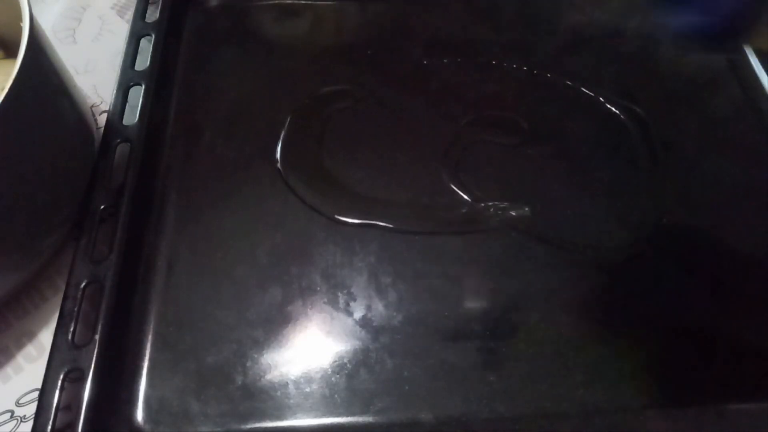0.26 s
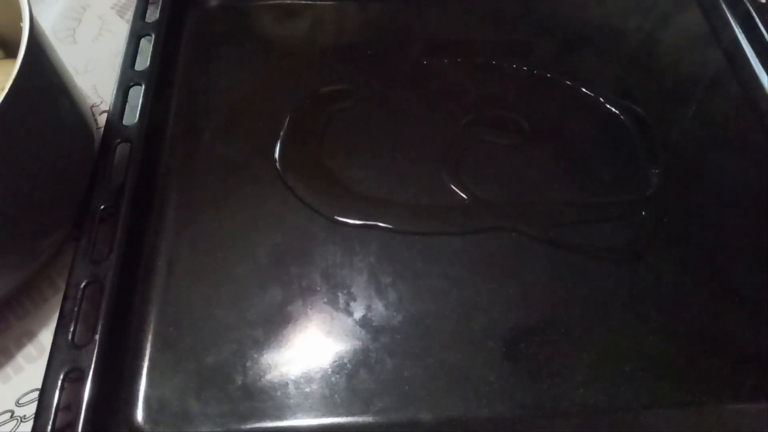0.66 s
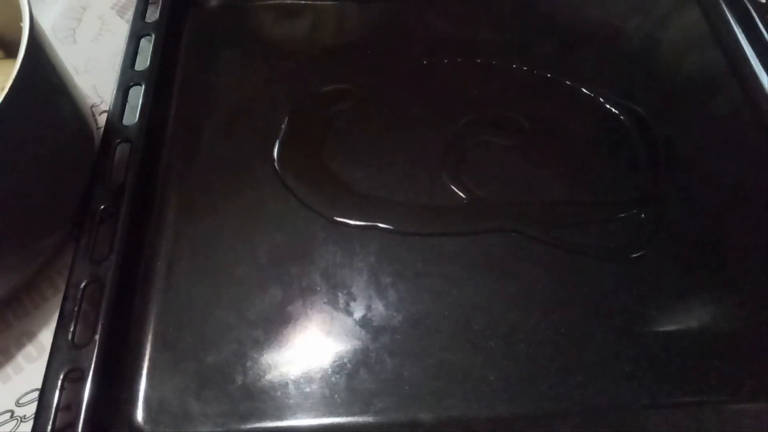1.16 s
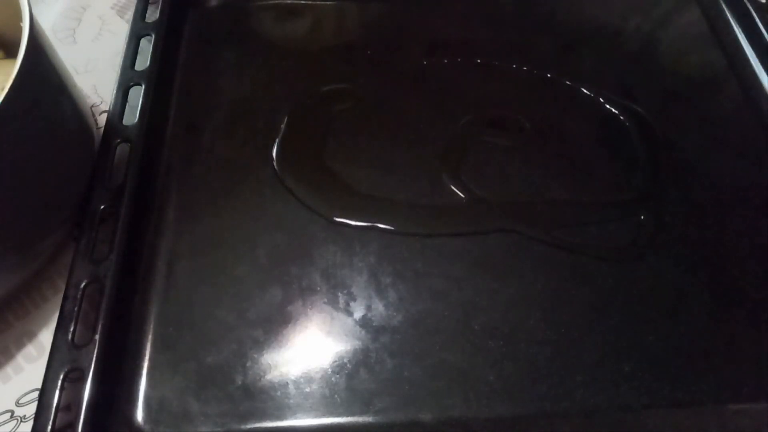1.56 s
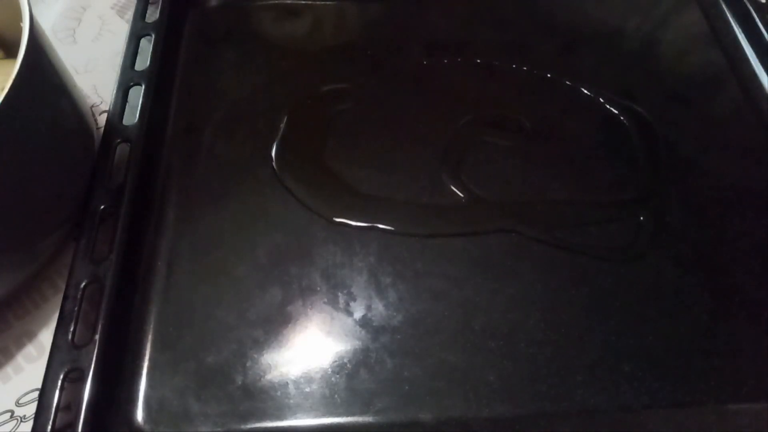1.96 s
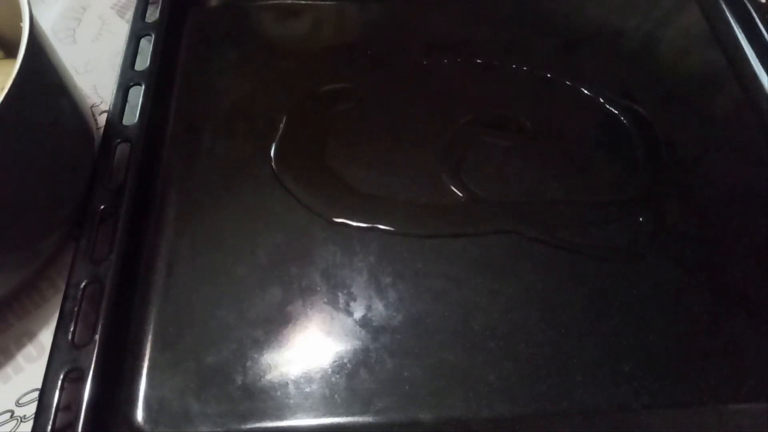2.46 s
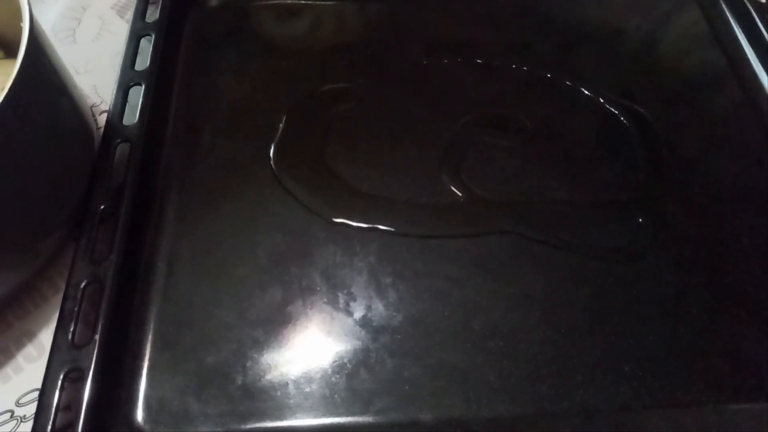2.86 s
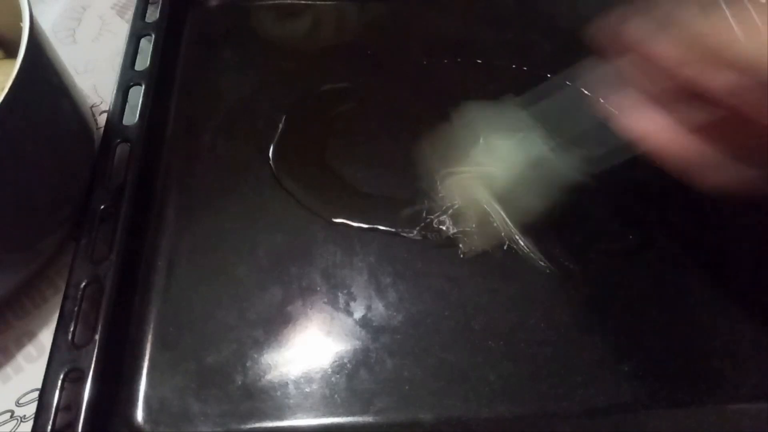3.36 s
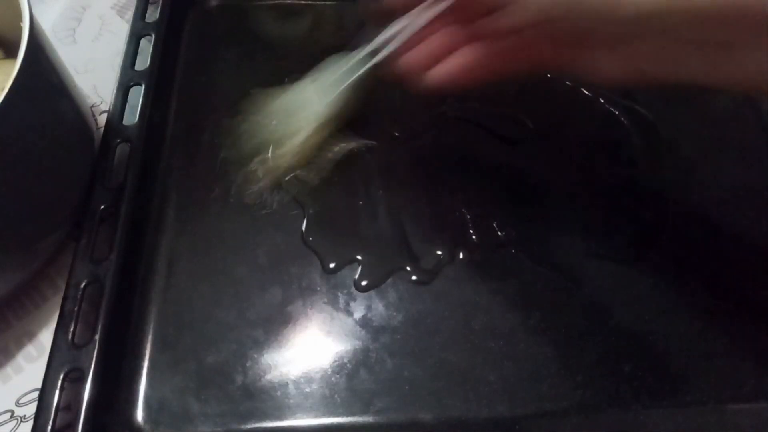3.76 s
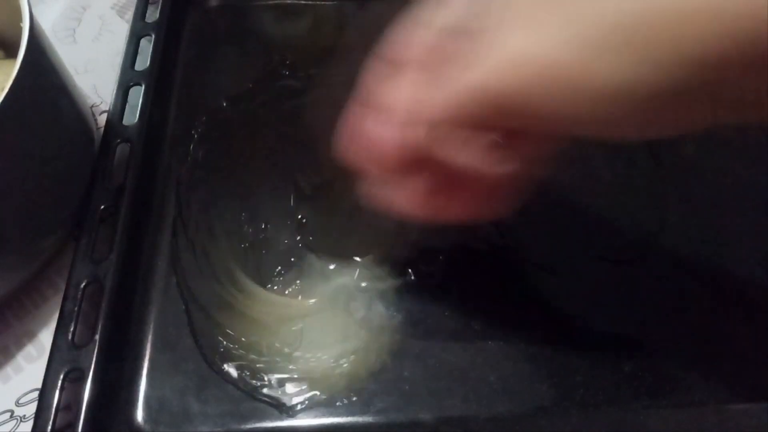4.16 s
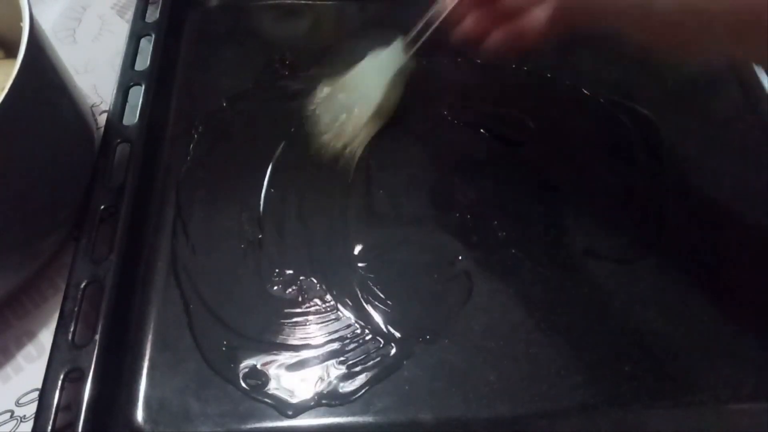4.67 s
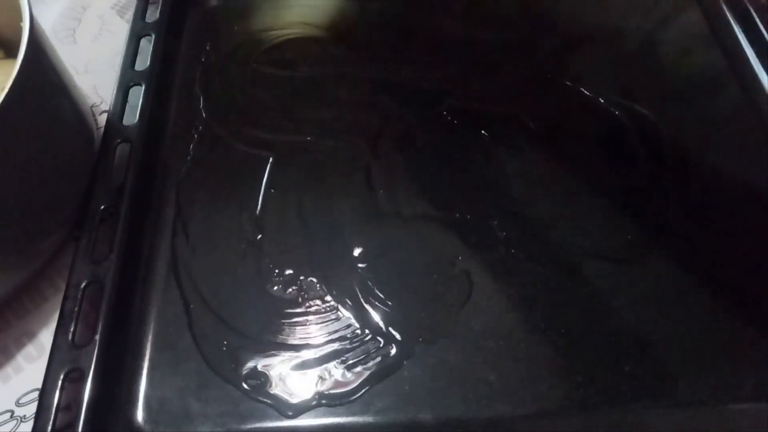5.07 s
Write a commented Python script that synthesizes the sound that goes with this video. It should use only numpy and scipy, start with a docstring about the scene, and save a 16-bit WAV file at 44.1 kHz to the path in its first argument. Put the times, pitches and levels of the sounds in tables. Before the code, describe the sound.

A handheld stereo microphone with faint hiss and muffled finger rumble hears quiet hand scuffs and taps, then a bottle landing hard on the worktop, by far the loudest sound, with a short boomy ring. After a lull and a few bright utensil clicks, a brush swishes over an oily baking tray, mostly to the right, with soft metallic drags, one squeak and a fainter gruff chatter near the end.

```python
"""Hand scuffs, light sliding and utensil knocks (bursts with two-mode rings), before and after
an oil bottle lands on a kitchen worktop: shoves, ringing modes, rattle.
A brush's bristles then drag oil over a metal tray: random catches drive its resonances, fizz, tick and
crackle, and two strokes chatter, one squeaky, one gruff: a stick-slip tone with scrape.
Throughout: finger shifts on a hand-held camera, hiss, a faint electronic tick; a small room answers."""
import sys
import numpy as np
from scipy import signal
from scipy.fft import rfft, irfft, next_fast_len
from scipy.io import wavfile
from scipy.ndimage import uniform_filter1d

SR = 44100
rng = np.random.default_rng(int(sys.argv[2]) if len(sys.argv) > 2 else 0)


def wav_record(signal):
    """Record a signal, one row per channel, as 16-bit PCM in the file named by sys.argv[1]."""
    frames = np.transpose(np.atleast_2d(signal))
    bounded = np.clip(frames, -1, 1)
    # unit amplitude maps onto the largest positive 16-bit level
    quanta = np.round(bounded * 32767).astype(np.int16)
    wavfile.write(sys.argv[1], SR, quanta)


N = 234258
TIME_S = np.arange(N) / SR

# Bottle base lands, rocks flat, settles:
# (time [s], push level [dB], push pitch [Hz], push length [s], rattle level [dB])
BOTTLE_LANDINGS = [(1.6183, -10.5, 225, 0.0055, -28), (1.6385, -18, 199, .019, -42.5),
                   (1.707, -25.5, 290, .016, -90)]
# Worktop and bottle modes: (frequency [Hz], relative level [dB], t60 [s])
WORKTOP_MODES = [(47, -17, .6), (60, -18, .6), (82, -14, .35), (94, -9, .45), (112, -7, .3), (127, 2, .3),
                 (152, 0, .38), (191, -4, .45), (234, -2, .45), (267, 0, .47), (282, 0, .47),
                 (312, -4, .42), (376, -11, .38), (412, -3, .35), (464, -15, .35), (550, -15, .4),
                 (603, -15, .38), (791, -19, .25), (1045, -6, .16), (1770, -20, .2)]
# Dense upper modes, spectrum: (frequency [Hz], relative density [dB per Hz])
RATTLE_SPECTRUM = [(200, -16.5), (330, 4.5), (600, 1), (1100, -5.5), (1500, -10), (2100, -11), (3300, -18),
                   (7000, -25.5), (10000, -30.5), (15500, -50)]
# Dense upper modes, decay: (frequency [Hz], t60 [s])
RATTLE_T60 = [(300, 0.42), (1200, 0.37), (3000, 0.29), (10000, 0.38)]

# Brush strokes: (firmest time [s], sigma [s], relative tray drag [dB], relative bristle fizz [dB])
BRUSH_STROKES = [(3.174, 0.019, -51.5, -68), (3.283, 0.049, -56, -58.5), (3.423, 0.035, -57.5, -73),
                 (3.567, 0.024, -54.5, -53.5), (3.711, 0.024, -56.5, -65.5), (3.826, 0.029, -67, -60.5),
                 (4.063, 0.025, -64.5, -55.5), (4.213, 0.11, -62, -60), (4.511, 0.043, -70, -65),
                 (4.821, 0.017, -69, -70.5), (5.101, 0.0217, -65.5, -64), (5.204, 0.029, -51, -61),
                 (5.279, 0.032, -84, -66)]
# Tray resonances: (frequency [Hz], bandwidth [Hz], relative level [dB])
TRAY_MODES = [(455, 27, 6.5), (648, 26.3, 10.5), (733, 260, 1.5), (842, 164, 1.5), (1030, 35, -1),
              (1194, 77, 0.5), (1495, 42, 7), (1823, 104, 0), (2240, 1140, -6)]
# Bristle fizz in air: (frequency [Hz], relative density [dB per Hz])
FIZZ_SPECTRUM = [(1060, -11.5), (1800, 3.5), (3690, -0.5), (4000, -2), (4260, -4), (6400, -2.5),
                 (10600, -8.5), (12100, -20.5), (15000, -6)]
# From this time the bristles stay in the oil; relative fizz between strokes
BRUSH_DOWN_S, GLIDE_FIZZ_DB = 3.14, -71.5

# Chattering strokes: (firmest time [s], sigma [s], tone level [dB], scrape level [dB],
# slip rate at firmest [Hz], glide [octaves per s])
CHATTERS = [(4.332, 0.018, -39.5, -36.5, 1547, -2.5), (5.198, 0.022, -49.5, -68, 732, 7)]
# Scrape under the chatter: (frequency [Hz], relative density [dB per Hz])
SCRAPE_SPECTRUM = [(530, -74), (900, -30), (1330, -23.5), (1530, 2.5), (1700, -10.5), (2230, -20.5),
                   (3360, -14.5), (3650, -23), (3830, -18), (5510, -16), (8330, -31), (9150, -28),
                   (15000, -33)]
# rms share by which the slip rate wanders; sigmas before the firmest point at which it catches
SLIP_WAVER, CATCH_SIGMAS = 0.07, 1.89

# Sticky bristles snap free of the oil: (time [s], relative level [dB], centre [Hz])
BRISTLE_SNAPS = [(3.8019, -44.5, 10650), (4.0327, -43.5, 5440), (4.059, -27.5, 6840), (4.5267, -41, 11080),
                 (4.5364, -42.5, 9500), (4.589, -43.5, 10290), (4.616, -50, 9900), (4.7071, -52, 9660),
                 (4.759, -47, 11670), (4.794, -54.5, 4700), (5.2614, -42.5, 11620)]
SNAP_OCTAVES, SNAP_T60_S = 0.48, 0.008

# Quick scuffs of hand and brush: (time [s], level [dB], sigma [s])
QUICK_SCUFFS = [(0.714, -60, 0.012), (0.807, -52, 0.0048), (0.836, -63, 0.0014), (0.972, -42, 0.0037),
                (1.023, -41, 0.0022), (3.145, -53.5, 0.0046), (3.212, -49, 0.0022), (3.248, -48, 0.007),
                (3.315, -52, 0.025), (3.589, -47.5, 0.0059), (3.806, -53, 0.0093), (4.172, -51, 0.0055),
                (4.228, -64, 0.014), (5.084, -53.5, 0.0042)]
# Scuffs on the tray: (frequency [Hz], relative density [dB per Hz])
TRAY_SCUFF_SPECTRUM = [(400, -37), (750, 29), (1300, -1), (2200, -1.5), (6500, -3.5), (8000, -9.5),
                       (15500, -8.5)]
# Dry scuffs off the tray: (frequency [Hz], relative density [dB per Hz])
HAND_SCUFF_SPECTRUM = [(400, -33), (750, 6.5), (1400, 0.5), (2100, 2.5), (3000, -3.5), (6600, 3),
                       (8000, -5.5), (15500, -6.5)]
# Harder scuffs are brighter and broader: reference level, its band centre and half width before colouring
SCUFF_REF_DB, SCUFF_REF_HZ, SCUFF_REF_OCTAVES = -48, 3750, 1.49
# extra level that doubles the centre, and the half width
CENTRE_DOUBLING_DB, WIDTH_DOUBLING_DB = 11.5, 4.5

# Utensils knock beside the tray: (time [s], crack level [dB], ring level [dB], lower ring mode [Hz])
UTENSIL_KNOCKS = [(1.118, -47.5, -57, 920), (1.194, -36.5, -40.5, 926), (1.293, -51, -49, 1296),
                  (2.406, -37, -38, 3310), (2.566, -44.5, -52.5, 4080), (2.614, -42, -50, 3980)]
# crack centre for a 1 kHz ring; share of the ring's octaves it follows; ring time
CRACK_REF_HZ, CRACK_FOLLOWS, KNOCK_T60_S = 4220, 0.27, 0.017

# Soft bumps on the worktop: (time [s], level [dB], pitch [Hz], length [s])
SOFT_BUMPS = [(1.448, -47.5, 136, 0.035), (1.603, -42.5, 45, 0.013), (2.423, -43.5, 130, 0.023),
              (2.607, -53, 116, 0.0225)]
# Things slide in the hand: (peak time [s], sigma [s], level [dB])
SLIDES = [(0.717, 0.066, -62.5), (0.804, 0.042, -64.5), (0.962, 0.019, -57), (1.118, 0.022, -68),
          (1.993, 0.03, -68), (2.458, 0.019, -56.5), (2.563, 0.041, -69)]
# Sliding in the hand: (frequency [Hz], relative density [dB per Hz])
SLIDE_SPECTRUM = [(290, -26), (500, -14.5), (1110, -9), (1450, -11), (1580, -11.5), (2100, -8.5),
                  (2500, -14), (6300, -11.5), (7910, -17.5), (15000, -18.5)]

# Fingers shift on the camera: (time [s], hold [s], relative rumble [dB], relative rub [dB],
# rub pitch shift [octaves], rumble fade [dB per s])
GRIP_SHIFTS = [(-0.04, 0.041, -51, -47.5, 0.022, 76), (0.14, 0.083, -60.5, -60.5, -0.16, 49),
               (0.693, 0.038, -76, -70, 0.062, 66), (0.813, 0.21, -57.5, -65, -0.1, 260),
               (1.08, 0.13, -76, -66.5, 0.07, 30), (1.389, 0.06, -50, -55.5, 0.38, 120),
               (1.961, 0.13, -55.5, -71.5, 0.031, 147.5), (2.414, 0.057, -57, -65, 0.075, 81),
               (2.57, 0.042, -61, -74.5, 0.13, 80.5), (2.841, 0.3, -47.5, -54, -0.3, 38.5),
               (3.299, 0.66, -62, -82.5, -0.3, 126.5), (4.022, 0.11, -59.5, -67.5, 0.46, 74),
               (4.374, 0.19, -59.5, -54.5, 0.29, 95.5), (4.579, 0.12, -64, -58.5, -0.048, 37.5),
               (5.082, 0.15, -62, -60.5, -0.089, 41.5)]
# Low part of a shift: (frequency [Hz], relative density [dB per Hz])
RUMBLE_SPECTRUM = [(21, -45), (35, -16), (54, -1.5), (91, 2), (146, 7.5), (183, -4.5), (246, -3.5),
                   (280, -24), (360, -34), (620, -120)]
# Rub before its pitch shift: (frequency [Hz], relative density [dB per Hz])
RUB_SPECTRUM = [(100, -42.5), (170, -13), (243, 3.5), (359, -10.5), (399, -6.5), (439, -31), (517, -23),
                (760, -33), (1000, -32), (1300, -67.5), (2200, -120)]
# share of the hold spent gathering speed; rub fade relative to rumble fade
GRIP_RISE, RUB_FADE_RATIO = 0.41, 1.22

# Kitchen reverberation: (frequency [Hz], t60 [s])
KITCHEN_T60 = [(150, 0.65), (1000, 0.3), (4000, 0.31), (12000, 0.22)]
# Air and microphone hiss: (frequency [Hz], relative density [dB per Hz])
HISS_SPECTRUM = [(15, -38.5), (25, -21), (82, 0.5), (152, -9), (255, -9.5), (542, -18), (1280, -22),
                 (4210, -21), (6660, -17), (7830, -30.5), (8970, -19.5), (11700, -30), (13400, -26.5),
                 (14600, -15.5), (15800, -14)]
# Electronic ticks within one cycle: (time [s])
TICK_TIMES_S = [.0388, .1086, .1618, .2149, .2855]
TICK_CYCLE_S = .30035
# Microphone port colour: (frequency [Hz], left minus right [dB])
PORT_DIFFERENCE = [(100, 0), (1000, 1.5), (2500, 1), (5000, -0.05), (8000, -2.5), (11500, 1), (15500, 10)]
BAND_LIMIT_HZ = 15800


def amp(db):
    """Amplitude factor of a level in dB."""
    return 10 ** (np.asarray(db) / 20)


def unit(x):
    """x at rms 1."""
    return x / np.sqrt(np.mean(x ** 2) + 1e-20)


def along(points, hz):
    """Interpolate (frequency [Hz], value) on a log axis."""
    f, v = np.transpose(points)
    return np.interp(np.log(hz + 1), np.log(f + 1), v)


def add(track, time_s, sound):
    """Mix a sound in from time_s, cut at the end of the track."""
    part = track[..., round(time_s * SR):][..., :sound.shape[-1]]
    part += sound[..., :part.shape[-1]]


def filtered(x, response):
    """Multiply the spectrum of x by a response of frequency."""
    n = x.shape[-1]
    size = next_fast_len(n + 8192)
    spectrum = rfft(x, size) * response(np.fft.rfftfreq(size, 1 / SR))
    return irfft(spectrum, size)[..., :n]


def coloured(x, spectrum):
    """x shaped by a spectrum, at rms 1."""
    return unit(filtered(x, lambda hz: amp(along(spectrum, hz))))


def band(hz, centre_hz, width):
    """A hump of gain, halved at width octaves to each side."""
    return 1 / (1 + (np.log2((hz + 1) / centre_hz) / width) ** 4)


def pair(n, side_db):
    """Noise at two microphones, partly alike."""
    mid, side = rng.standard_normal((2, n))
    return unit(np.array([mid + amp(side_db) * side, mid - amp(side_db) * side]))


def slips(rate_hz, spread_db, smooth, size=N):
    """Tiny catches of uneven size at random times, on a bed of smooth friction."""
    strength = amp(spread_db * np.minimum(rng.exponential(size=size), 4))
    strength = strength * rng.choice([-1, 1], size)
    catches = unit(strength * (rng.random(size) < rate_hz / SR))
    return unit(catches + smooth * rng.standard_normal(size))


def patchy(x, depth_db):
    """The colour shifts as the contact moves over the surface."""
    z = signal.stft(x, nperseg=512)[2]
    field = uniform_filter1d(rng.standard_normal(z.shape), size=4, axis=0)
    field = uniform_filter1d(field, size=7, axis=1)
    return unit(signal.istft(z * amp(depth_db * unit(field)), nperseg=512)[1][:N])


def dying(noise, decay):
    """Each frequency of the noise dies at its own speed."""
    hz, t, z = signal.stft(noise, SR, nperseg=256)
    fade = amp(-60 * t / along(decay, hz)[:, None])
    return signal.istft(z * fade, SR, nperseg=256)[1][:, :noise.shape[-1]]


def in_room(x, wet_db):
    """Direct sound plus the kitchen's diffuse answer, scaled to hold total power."""
    tail = dying(pair(SR // 2, side_db=-2), KITCHEN_T60)
    tail = tail / np.linalg.norm(tail[0])
    tail = np.pad(tail, ((0, 0), (SR // 500, 0)))  # answer starts 2 ms late
    echo = signal.fftconvolve(np.atleast_2d(x), tail, axes=1)[:, :x.shape[-1]]
    return (x + amp(wet_db) * echo) / np.hypot(1, amp(wet_db))


def to_right(x, db, lag_s=0):
    """The right microphone is louder by db; the left one hears it lag_s later."""
    x = x * amp(np.array([[-db], [db]]) / 2)
    return filtered(x, lambda hz: np.exp(np.pi * 1j * hz * lag_s * np.array([[-1], [1]])))


def push(hz, length_s):
    """The worktop gives under a load and springs back: a cosine under a rounded arch."""
    t = np.arange(int(length_s * SR)) / SR
    arch = np.sqrt(np.abs(np.sin(np.pi * t / length_s)))
    return arch * np.cos(2 * np.pi * hz * (t - length_s / 2))


def crack(centre_hz, width, t60_s):
    """A decaying noise burst around one pitch, at set energy."""
    t = np.arange(SR // 3) / SR
    burst = filtered(pair(len(t), side_db=-9), lambda hz: band(hz, centre_hz, width))
    burst = burst * amp(-60 * t / t60_s)
    return amp(11.5) * burst / np.linalg.norm(burst[0])


def swell(time_s, sigma_s):
    """Gaussian pressure: builds up to time_s and eases off."""
    return np.exp(-((TIME_S - time_s) / sigma_s) ** 2 / 2)


def bottle():
    """The first landing rings the worktop's modes; each one shoves it and rattles what stands on it."""
    out, t = np.zeros((2, N)), np.arange(SR) / SR
    ring = np.zeros(SR)
    for k, (hz, db, t60_s) in enumerate(WORKTOP_MODES):
        ring += (-1) ** k * amp(db - 60 * t / t60_s) * np.sin(2 * np.pi * hz * t)
    add(out, BOTTLE_LANDINGS[0][0], amp(-24.0) * ring * (1 - np.exp(-t / 0.012)))
    for time_s, push_db, push_hz, length_s, rattle_db in BOTTLE_LANDINGS:
        rattle = dying(coloured(pair(SR, side_db=-1.5), RATTLE_SPECTRUM), RATTLE_T60)
        add(out, time_s, amp(push_db) * push(push_hz, length_s))
        add(out, time_s, amp(rattle_db) * rattle * (1 - np.exp(-t / .0012)))
    return to_right(in_room(out, wet_db=-16.0), db=5.5, lag_s=.00015)


def tray(f):
    """Tray response: a sum of damped resonances in alternating phase."""
    total = 0
    for k, (hz, width_hz, db) in enumerate(TRAY_MODES):
        damping = 1j * f * width_hz
        total = total + (-1) ** k * amp(db) * damping / (hz * hz - f * f + damping)
    return total


def bristle_work():
    """How hard the bristles stir the oil: a light glide with the strokes on top."""
    strokes = sum(amp(fizz_db) * swell(s, sigma_s) for s, sigma_s, _, fizz_db in BRUSH_STROKES)
    return np.hypot(strokes, amp(GLIDE_FIZZ_DB) * (TIME_S > BRUSH_DOWN_S))


def brush():
    """Bristles catch and let go in the oil: they fizz in the air and shake the tray's resonances."""
    pressure = sum(amp(drag_db) * swell(s, sigma_s) for s, sigma_s, drag_db, _ in BRUSH_STROKES)
    catches = patchy(slips(rate_hz=1500, spread_db=-0.55, smooth=1.0), depth_db=3.5)
    drag = unit(filtered(catches, lambda f: tray(f) * band(f, centre_hz=1140, width=1.17)))
    fizz = bristle_work() * coloured(catches, FIZZ_SPECTRUM)
    stroke = amp(-4.0) * pressure * drag + fizz
    return to_right(in_room(stroke, wet_db=-7), db=9.5, lag_s=0.00021)


def squeaks():
    """Pressed hard, bristles stick and slip: one squeak falls slightly, one gruff chatter rises in pitch."""
    out = np.zeros(N)
    for time_s, sigma_s, tone_db, scrape_db, slip_hz, glide in CHATTERS:
        waver = unit(uniform_filter1d(rng.standard_normal(N), size=80))
        rate_hz = slip_hz * 2 ** np.clip(glide * (TIME_S - time_s), -1, 1)
        turns = np.cumsum(rate_hz * (1 + SLIP_WAVER * waver)) / SR
        tone = np.sin(2 * np.pi * turns) + amp(-11) * np.sin(4 * np.pi * turns)
        scrape = coloured(slips(rate_hz=5000, spread_db=1, smooth=.7), SCRAPE_SPECTRUM)
        caught = np.clip((TIME_S - time_s + CATCH_SIGMAS * sigma_s) / 0.0023, 0, 1)
        chatter = amp(tone_db) * tone + amp(scrape_db) * scrape
        out += caught * swell(time_s, sigma_s) * chatter
    return to_right(in_room(out, wet_db=-6.5), db=7.5, lag_s=.00025)


def ticks():
    """Bristles flick off the tray, and threads of oil break: short banded bursts."""
    out = np.zeros((2, N))
    for time_s, db, centre_hz in BRISTLE_SNAPS:
        snap = amp(db + 3) * crack(centre_hz, SNAP_OCTAVES, SNAP_T60_S)
        add(out, time_s, in_room(snap, wet_db=-5.5))
    return to_right(out, db=5, lag_s=0.000184)


def scuffs():
    """Short rubs: a dense run of catches that swells and stops, off the tray at first and then on it."""
    (beside, on_tray), t = np.zeros((2, N)), np.arange(-SR // 10, SR // 10) / SR
    for time_s, db, sigma_s in QUICK_SCUFFS:
        centre_hz = SCUFF_REF_HZ * 2 ** ((db - SCUFF_REF_DB) / CENTRE_DOUBLING_DB)
        width = SCUFF_REF_OCTAVES * 2 ** ((db - SCUFF_REF_DB) / WIDTH_DOUBLING_DB)
        catches = slips(rate_hz=3500, spread_db=2, smooth=.5, size=len(t))
        grain = filtered(catches, lambda hz: band(hz, centre_hz, width))
        track, spectrum = beside, HAND_SCUFF_SPECTRUM
        if time_s + sigma_s > BRUSH_DOWN_S:
            track, spectrum = on_tray, TRAY_SCUFF_SPECTRUM
        envelope = np.exp(-(t / sigma_s) ** 2 / 2)
        add(track, time_s + t[0], amp(db) * coloured(grain, spectrum) * envelope)
    beside = to_right(in_room(beside, wet_db=0), db=2.5, lag_s=-.0004)
    return beside + to_right(in_room(on_tray, wet_db=-1), db=6.5, lag_s=0.00016)


def crackle():
    """Sparse fine bristle ticks crackle, more strongly as the bristles work harder."""
    fine_ticks = slips(rate_hz=90, spread_db=4, smooth=0)
    fine_ticks = unit(filtered(fine_ticks, lambda hz: band(hz, centre_hz=9000, width=.9)))
    crackling = amp(-15) * bristle_work() * fine_ticks
    return to_right(in_room(crackling, wet_db=-7.5), db=10.5, lag_s=0.00009)


def knocks():
    """Plastic on wood: a crack and a short ring of two close modes."""
    out, t = np.zeros((2, N)), np.arange(SR // 3) / SR
    for time_s, crack_db, ring_db, ring_hz in UTENSIL_KNOCKS:
        modes = np.sin(2 * np.pi * ring_hz * t) + amp(-1.5) * np.sin(2 * np.pi * 1.23 * ring_hz * t)
        ring = amp(ring_db - 60 * t / KNOCK_T60_S) * modes
        centre_hz = CRACK_REF_HZ * (ring_hz / 1000) ** CRACK_FOLLOWS
        hit = amp(crack_db) * crack(centre_hz, width=0.88, t60_s=0.0081) + ring
        add(out, time_s, in_room(hit, wet_db=2.5))
    return to_right(out, db=5.0, lag_s=-0.00033)


def bumps():
    """Dull nudges that reach the worktop: single pushes."""
    out = np.zeros(N)
    for time_s, db, hz, length_s in SOFT_BUMPS:
        add(out, time_s, amp(db) * push(hz, length_s))
    return to_right(in_room(out, wet_db=-15), db=4)


def rustle():
    """Light sliding friction while the bottle is put away and the brush is fetched."""
    level = sum(amp(db) * swell(s, sigma_s) for s, sigma_s, db in SLIDES)
    slide = coloured(slips(rate_hz=1800, spread_db=2.5, smooth=.6), SLIDE_SPECTRUM)
    return to_right(in_room(level * slide, wet_db=6.5), db=1.5, lag_s=-0.00034)


def shift(time_s, hold_s, fade_db_per_s):
    """A movement starts at time_s, gathers speed, keeps it up and dies away."""
    age_s = TIME_S - time_s
    rise = np.sin(np.pi / 2 * np.clip(age_s / (GRIP_RISE * hold_s), 0, 1)) ** 2
    return rise * amp(-fade_db_per_s * np.maximum(age_s - hold_s, 0))


def creep(spectrum, side_db):
    """Muffled skin slips heard through the camera's body, partly alike at both microphones."""
    both = coloured(slips(rate_hz=350, spread_db=-1.5, smooth=1.0), spectrum)
    apart = coloured(slips(rate_hz=350, spread_db=-1.5, smooth=1.0), spectrum)
    return unit(np.array([both + amp(side_db) * apart, both - amp(side_db) * apart]))


def grip():
    """Skin creeps over the camera's case: a low rumble and a pitch-shifted rub per shift."""
    levels, rub = [], np.zeros((2, N))
    for time_s, hold_s, rumble_db, rub_db, octaves, fade in GRIP_SHIFTS:
        levels.append(amp(rumble_db) * shift(time_s, hold_s, fade))
        spectrum = np.array(RUB_SPECTRUM) * [2 ** octaves, 1]
        rub_level = amp(rub_db) * shift(time_s, hold_s, RUB_FADE_RATIO * fade)
        rub += rub_level * creep(spectrum, side_db=-6.5)
    rumble = np.max(levels, axis=0) * creep(RUMBLE_SPECTRUM, side_db=-16.5)
    return to_right(amp(-6.5) * rumble + amp(-3.5) * rub, db=8)


def hiss():
    """Still room air and microphone hiss: steady coloured noise."""
    return to_right(amp(-67.5) * coloured(pair(N, side_db=0), HISS_SPECTRUM), db=4.0)


def electronics():
    """The camera's electronics tick faintly in an uneven repeating cycle, coloured like the hiss."""
    times_s = (np.arange(0, N / SR, TICK_CYCLE_S)[:, None] + TICK_TIMES_S).ravel()
    strengths = amp(rng.normal(0, 1, len(times_s)))
    spikes = np.bincount(np.round(times_s * SR).astype(int), strengths, N)[:N]
    ticking = filtered(spikes, lambda hz: band(hz, centre_hz=9000, width=0.66))
    return amp(-84) * coloured(ticking, HISS_SPECTRUM)


def scene():
    """Sources pass the two differing microphone ports; hiss and electronics join after them."""
    worktop = bottle() + bumps() + knocks() + rustle()
    oiling = brush() + scuffs() + squeaks() + ticks() + crackle()
    halves = np.array([[.5], [-.5]])
    heard = filtered(worktop + oiling + grip(), lambda hz: amp(along(PORT_DIFFERENCE, hz) * halves))
    return heard + hiss() + electronics()


def record(dry):
    """The camera keeps nothing above its band limit."""
    return filtered(dry, lambda hz: hz < BAND_LIMIT_HZ)


dry = scene()
out = record(dry)
wav_record(out)
```